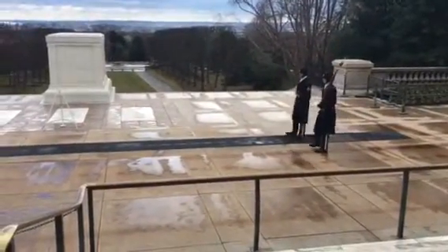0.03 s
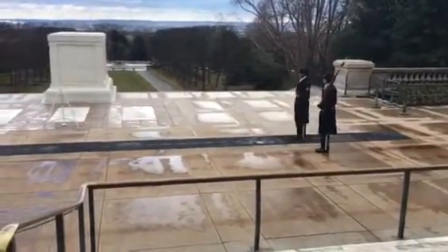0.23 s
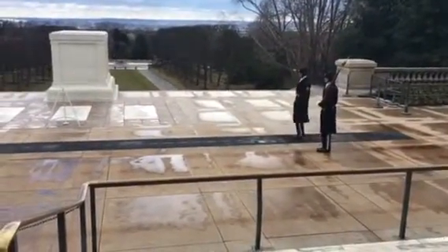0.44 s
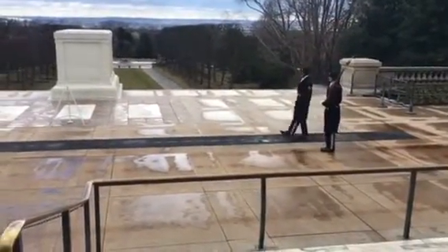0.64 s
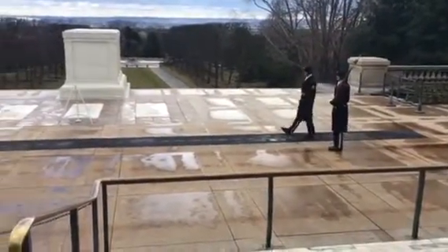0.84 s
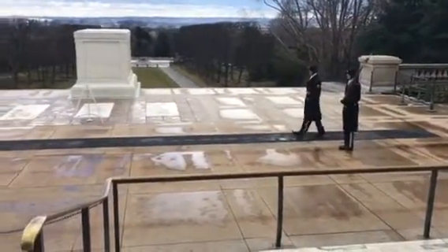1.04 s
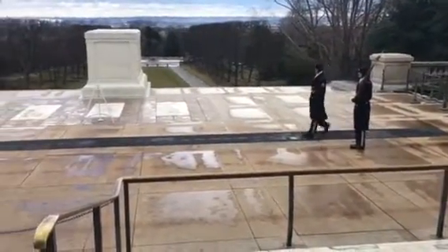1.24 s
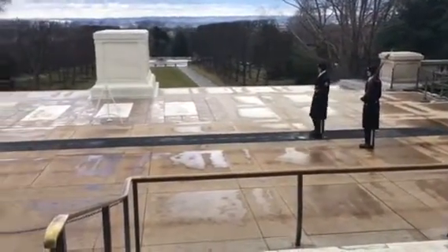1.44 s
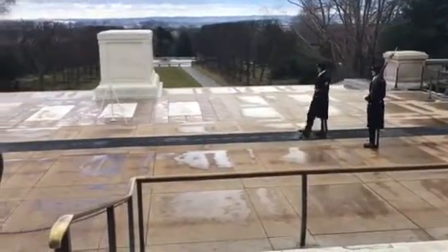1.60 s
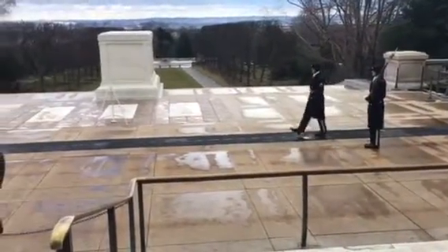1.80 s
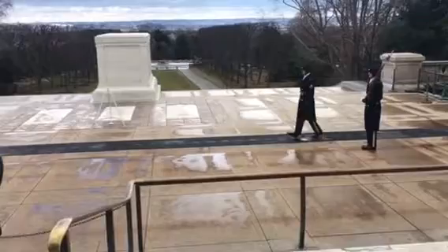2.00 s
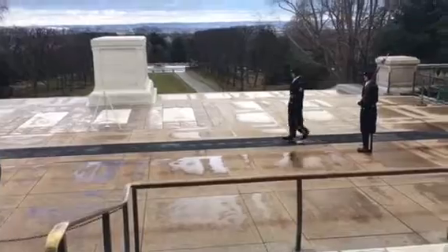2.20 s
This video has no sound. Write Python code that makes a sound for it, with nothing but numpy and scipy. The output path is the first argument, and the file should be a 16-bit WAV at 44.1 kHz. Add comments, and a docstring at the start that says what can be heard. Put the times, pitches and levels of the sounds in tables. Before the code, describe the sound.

Metal-plated shoes clack sharply on a wet stone plaza: a guard's heels snap together, a few faint steps follow, then one heel stamps with a thin jingle. The hits echo briefly while low wind rumbles on the microphone.

```python
"""Open plaza, wet stone: guards drill in metal-plated shoes.
A double heel clack, a faint scuff, a few soft steps, then one heel stamp and a thin jingle.
Each hard blow rings the modes of sole and heel and cracks the plate (a short noise burst).
Nearby steps scatter the sound, a low wall slaps it back, distant stonework echoes.
Low wind rumbles over a faint far-off wash."""
import sys
import numpy as np
from scipy import signal
from scipy.fft import rfft, irfft, next_fast_len
from scipy.io import wavfile
from scipy.ndimage import map_coordinates

SR = 44100
rng = np.random.default_rng(int(sys.argv[2]) if len(sys.argv) > 2 else 0)


def wav_out(sig):
    """Save sig, one row per channel (or a flat mono array), as 16-bit PCM at SR to the path in sys.argv[1]."""
    wavfile.write(sys.argv[1], SR, np.round(np.clip(np.atleast_2d(sig).T, -1, 1) * 32767).astype(np.int16))


N = 103635

# wind rumble (frequency [Hz], relative density [dB])
WIND_SPECTRUM = [(15, -40), (27, -34), (35, -21), (50, 2), (63, -1), (85, -1), (120, -6), (200, -12.5),
                 (350, -20), (800, -48.5), (3000, -82)]
# wind gusts (time [s], level [dB])
GUSTS = [(0.0, -43.5), (0.12, -49), (0.2, -45.5), (0.41, -43.5), (0.47, -46.5), (0.529, -38.5), (0.59, -47),
         (0.73, -44.5), (0.95, -49), (0.99, -41.5), (1.32, -48.5), (1.429, -43.5), (1.47, -51.5),
         (1.571, -41.5), (1.801, -50.5), (2.05, -40), (2.13, -60), (2.19, -44.5), (2.35, -51)]
# far-off wash (frequency [Hz], relative density [dB])
WASH_SPECTRUM = [(40, 0.5), (150, 1.5), (320, -0.5), (450, -6.5), (800, -8), (1200, -12.5), (2000, -22),
                 (3000, -30.5), (5000, -37.5), (9000, -42), (15500, -48.5)]
# stonework echo (frequency [Hz], relative gain [dB])
ECHO_COLOUR = [(150, -2.5), (400, -13), (900, -19), (1600, -16.5), (3000, -12), (5000, -10), (6400, -8.5),
               (7200, -6.5), (8200, -7.5), (9500, -10.5), (11000, -8.5), (15000, -17)]
# echo decay (frequency [Hz], T60 [s])
ECHO_DECAY = [(200, 0.2), (1000, 0.59), (3000, 0.64), (7000, 0.59), (11000, 0.37), (16000, 0.58)]
# sole brushes (time [s], level [dB], spread [s])
SCUFF_EVENTS = [(0.663, -73, .005), (0.674, -75, 0.0033)]
# sole hiss (frequency [Hz], relative density [dB])
SCUFF_SPECTRUM = [(3000, -22), (6000, -5), (9200, 0), (11000, -14), (15500, -14)]
# loose metal touches (time [s], level [dB])
JINGLE_EVENTS = [(2.1125, -36.5), (2.1168, -39), (2.124, -38)]
# loose metal (frequency [Hz], relative density [dB])
JINGLE_SPECTRUM = [(4000, -15), (8400, -12), (9800, -22), (11200, 7), (12300, -10), (15500, -20)]
# soft footfalls (time [s], tap [dB], click [dB], spit [dB])
STEP_EVENTS = [(1.1792, -37, -59.5, -55.5), (1.1845, -58, -60, -61.5), (1.1937, -71, -50.5, -62),
               (1.2184, -59, -65, -54), (1.3855, -57, -38, -74), (2.082, -34, -37, -47),
               (2.099, -60, -39, -58)]
# dull sole tap (frequency [Hz], relative density [dB])
TAP_SPECTRUM = [(200, -26.5), (800, 13.5), (2000, -10), (6000, -40.5)]
# light sole click (frequency [Hz], relative density [dB])
CLICK_SPECTRUM = [(900, -22), (1500, 2), (2850, -10), (3400, 6.5), (4300, 4), (5000, -8), (6500, 3),
                  (7200, -16), (11000, -15), (16000, -45)]
# spit of water (frequency [Hz], relative density [dB])
SPIT_SPECTRUM = [(2000, -25), (6000, -11), (9000, -4), (12000, -3), (15500, -5)]
# heel on stone, then its quick reflection off nearby stone (time [s], knock [dB], plate [dB])
STAMP_EVENTS = [(2.0707, -8.5, -15.5), (2.0761, -20, -35.5)]
# stamped heel (frequency [Hz], level [dB], T60 [s])
STAMP_KNOCK_MODES = [(169.6, -17, 0.063), (278, -17.5, 0.052), (717, -11, 0.022), (810, 4, 0.0054),
                     (914, -6, 0.019), (1350, -19.5, 0.023)]
# plate on stone (frequency [Hz], relative density [dB])
STAMP_PLATE_SPECTRUM = [(400, -1), (1700, 5.5), (2300, 10), (2900, 4), (3800, -2.5), (5000, 1), (5900, 1),
                        (6600, -5.5), (7500, 3), (9300, -16.5), (10400, -7), (12500, -14), (16000, -25)]
# heels touch, then meet twice (time [s], knock [dB], clack [dB], plate [dB], plate tilt [dB/octave])
SNAP_EVENTS = [(0.2296, -23, -38.5, -15, 1.5), (0.256, -18, -29, -14, 1.5), (0.2586, -11, -8.5, -13, 1)]
# hollow shoe knock (frequency [Hz], level [dB], T60 [s])
SNAP_KNOCK_MODES = [(155.3, -10.5, 0.053), (252, -8.5, 0.028), (317.4, -2.5, 0.023), (622, -2, 0.031),
                    (753, 6, 0.0073), (914, -1, 0.017)]
# hard shoe clack (frequency [Hz], level [dB], T60 [s])
SNAP_CLACK_MODES = [(1396, -11, 0.02), (1494, 1, 0.016), (1904, -8.5, 0.02), (2650, -24.5, .015),
                    (3310, -9.5, 0.013), (3640, -16, 0.026)]
# plate on plate, before tilt (frequency [Hz], relative density [dB])
SNAP_PLATE_SPECTRUM = [(300, -32), (1200, 9), (2500, 2), (3400, 0.5), (4400, -4), (5400, 0), (6700, 5.5),
                       (7600, -5.5), (9000, 4.5), (10500, -4.5), (12500, -10.5), (16000, -17)]

CONTACT_S = 0.00045
NEAR_DELAY_S, NEAR_T60_S, NEAR_DB = 0.009, 0.12, -19
ECHO_DELAY_S, ECHO_RISE_S = 0.0013, 0.047
WALL_DELAY_S, WALL_RISE_S, WALL_DB, WALL_T60_RATIO = 0.135, 0.046, 2.5, 0.17


def amp(db):
    """Decibels to gain."""
    return 10 ** (np.asarray(db) / 20)


def along(points, hz):
    """Interpolate (Hz, value) points on a log frequency axis."""
    knots_hz, values = np.transpose(points)
    return np.interp(np.log(hz + 1), np.log(knots_hz + 1), values)


def filtered(x, response):
    """Apply a gain given as a function of Hz."""
    size = next_fast_len(len(x) + 8192)
    return irfft(rfft(x, size) * response(np.fft.rfftfreq(size, 1 / SR)), size)[:len(x)]


def noise(spectrum, size):
    """Coloured noise, rms 1."""
    x = filtered(rng.standard_normal(size), lambda hz: amp(along(spectrum, hz)))
    return x / np.sqrt(np.mean(x ** 2) + 1e-20)


def fade(t, t60_s):
    """Exponential decay, 60 dB in t60_s."""
    return np.exp(-np.log(1000) * np.maximum(t, 0) / t60_s)


def rise(t, tau_s):
    """Soft onset from t = 0."""
    return 1 - np.exp(-np.maximum(t, 0) / tau_s)


def add(track, start_s, sound):
    """Mix a sound into the track."""
    part = track[round(start_s * SR):][:len(sound)]
    part += sound[:len(part)]


def air(flutter_db=0.7, flutter_hz=19, wash_db=-51):
    """Fluttering wind on the microphone over the steady wash of the surroundings."""
    t = np.arange(N) / SR
    rumble = noise(WIND_SPECTRUM, N)
    gust_db = np.interp(t, *np.transpose(GUSTS))
    flutter = map_coordinates(rng.standard_normal(256), [t * flutter_hz], mode="wrap")
    return rumble * amp(gust_db + flutter_db * flutter) + noise(WASH_SPECTRUM, N) * amp(wash_db)


def diffuse_spectrum(sound, hz, blur_octaves=0.25):
    """Smoothed magnitude spectrum: averaging over all directions fills fine notches."""
    power = np.abs(rfft(sound)) ** 2
    octaves = np.log2((np.fft.rfftfreq(len(sound), 1 / SR) + 1) / (hz[:, None] + 1))
    weight = np.exp(-0.5 * (octaves / blur_octaves) ** 2)
    return np.sqrt(weight @ power / weight.sum(axis=1))


def stone_echo(sound, echo_db):
    """Diffuse tail from distant stonework, with a late swell from a far wall."""
    hz, t, grains = signal.stft(rng.standard_normal(SR), SR, nperseg=256)
    t60_s = along(ECHO_DECAY, hz)[:, None]
    tail = rise(t - ECHO_DELAY_S, ECHO_RISE_S) * fade(t, t60_s)
    swell = rise(t - WALL_DELAY_S, WALL_RISE_S) * fade(t - WALL_DELAY_S, WALL_T60_RATIO * t60_s)
    envelope = np.hypot(tail, amp(WALL_DB) * swell)
    envelope /= np.sqrt(SR * np.mean(envelope ** 2, axis=1, keepdims=True))
    colour = diffuse_spectrum(sound, hz) * amp(echo_db + along(ECHO_COLOUR, hz))
    return signal.istft(grains * envelope * colour[:, None], SR, nperseg=256)[1][:SR]


def plaza(sound, echo_db):
    """Direct sound, scatter from nearby stone steps, distant echo."""
    t = np.arange(SR) / SR
    scatter = rng.standard_normal(SR) * (t > NEAR_DELAY_S) * fade(t, NEAR_T60_S)
    near_response = (t == 0) + amp(NEAR_DB) * scatter / np.linalg.norm(scatter)
    return signal.fftconvolve(sound, near_response)[:SR] + stone_echo(sound, echo_db)


def wall_slap(sound, delay_s, spread_s=0.0035, gain_db=-23.5, cutoff_hz=1516):
    """One smeared, dull reflection from a low wall."""
    t = np.arange(SR // 5) / SR
    smear = rng.standard_normal(len(t)) * np.exp(-0.5 * ((t - delay_s) / spread_s) ** 2)
    reflection = signal.fftconvolve(sound, amp(gain_db) * smear / np.linalg.norm(smear))
    return signal.sosfilt(signal.butter(2, cutoff_hz, fs=SR, output="sos"), reflection)


def scuffs():
    """A sole brushes wet stone: faint hiss, swelling and fading."""
    t = np.arange(N) / SR
    envelope = sum(amp(db) * np.exp(-0.5 * ((t - peak_s) / spread_s) ** 2)
                   for peak_s, db, spread_s in SCUFF_EVENTS)
    return noise(SCUFF_SPECTRUM, N) * envelope


def jingle():
    """Loose metal on the shoe: thin touches after the stamp."""
    track, t = np.zeros(N), np.arange(SR // 10) / SR
    envelope = rise(t, tau_s=0.00087) * fade(t, t60_s=0.01)
    for start_s, db in JINGLE_EVENTS:
        touch = amp(db) * noise(JINGLE_SPECTRUM, len(t))
        add(track, start_s, plaza(touch * envelope, echo_db=-3))
    return track


def soft_steps():
    """Soles roll on wet stone: dull tap, light click, spit of water."""
    track, t = np.zeros(N), np.arange(SR // 10) / SR
    envelope = rise(t, tau_s=0.00096) * fade(t, t60_s=0.012)
    spectra = TAP_SPECTRUM, CLICK_SPECTRUM, SPIT_SPECTRUM
    for start_s, *levels_db in STEP_EVENTS:
        touch = sum(amp(db) * noise(spectrum, len(t)) for db, spectrum in zip(levels_db, spectra))
        add(track, start_s, plaza(touch * envelope, echo_db=-3.5))
    return track


def shoe_ring(modes, t, scatter_db=1.5, highpass_hz=178):
    """Damped modes of sole and heel, with the deep bass cut away."""
    ring = sum(amp(db + scatter_db * rng.normal()) * fade(t, t60_s) * np.sin(2 * np.pi * hz * t)
               for hz, db, t60_s in modes)
    bass_cut = signal.butter(2, highpass_hz, "high", fs=SR, output="sos")
    return signal.sosfilt(bass_cut, ring * rise(t, CONTACT_S))


def plate_crack(spectrum, t, tilt_db_per_octave=0, ring_db=-22.5):
    """Struck metal plate: very short burst, faint after-ring."""
    tilted = [(hz, db + tilt_db_per_octave * np.log2(hz)) for hz, db in spectrum]
    decay = fade(t, t60_s=0.0044) + amp(ring_db) * fade(t, t60_s=0.066)
    return noise(tilted, len(t)) * rise(t, CONTACT_S) * decay


def heel_stamp(plate_lead_s=0.00049):
    """One heel strikes stone: bright plate edge, round knock, quick reflection off nearby stone."""
    track, t = np.zeros(N), np.arange(SR // 10) / SR
    for start_s, knock_db, plate_db in STAMP_EVENTS:
        knock = amp(knock_db) * shoe_ring(STAMP_KNOCK_MODES, t - plate_lead_s)
        crack = amp(plate_db) * plate_crack(STAMP_PLATE_SPECTRUM, t)
        blow = knock + crack
        add(track, start_s, plaza(blow, echo_db=2.5))
        add(track, start_s, wall_slap(blow, delay_s=0.087))
    return track


def heel_snap():
    """Heels snap together: both shoes knock and clack, their plates crack."""
    track, t = np.zeros(N), np.arange(SR // 10) / SR
    for start_s, knock_db, clack_db, plate_db, tilt_db_per_octave in SNAP_EVENTS:
        knock = amp(knock_db) * shoe_ring(SNAP_KNOCK_MODES, t)
        clack = amp(clack_db) * shoe_ring(SNAP_CLACK_MODES, t)
        crack = amp(plate_db) * plate_crack(SNAP_PLATE_SPECTRUM, t, tilt_db_per_octave)
        blow = knock + clack + crack
        add(track, start_s, plaza(blow, echo_db=-4))
        add(track, start_s, wall_slap(blow, delay_s=0.072))
    return track


def scene():
    """Air and shoes, mono."""
    return (air() + heel_snap() + heel_stamp() + soft_steps() + scuffs() + jingle())[None]


def record(dry):
    """Steep low-pass band limit."""
    cutoff_hz = 15900
    return np.array([filtered(channel, lambda hz: 1 / np.sqrt(1 + (hz / cutoff_hz) ** 160))
                     for channel in dry])


dry = scene()
out = record(dry)
wav_out(out)
```